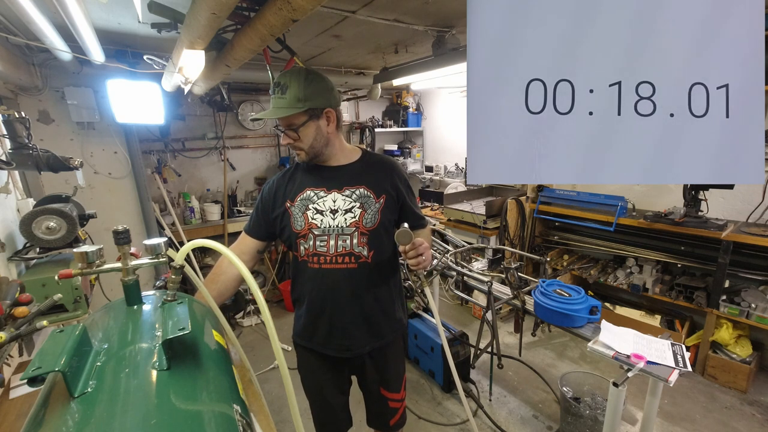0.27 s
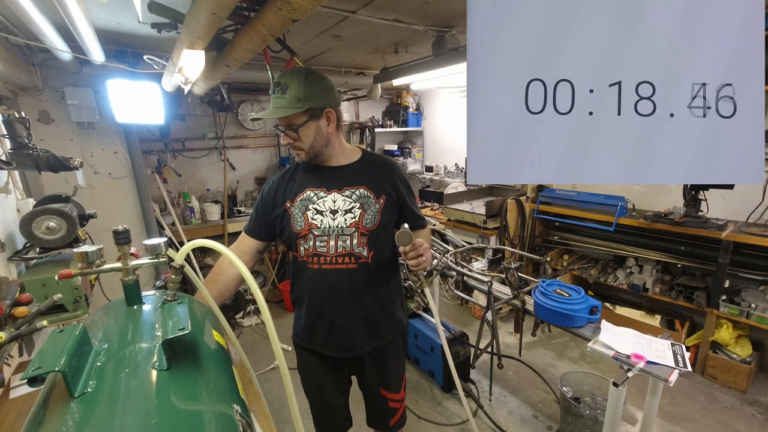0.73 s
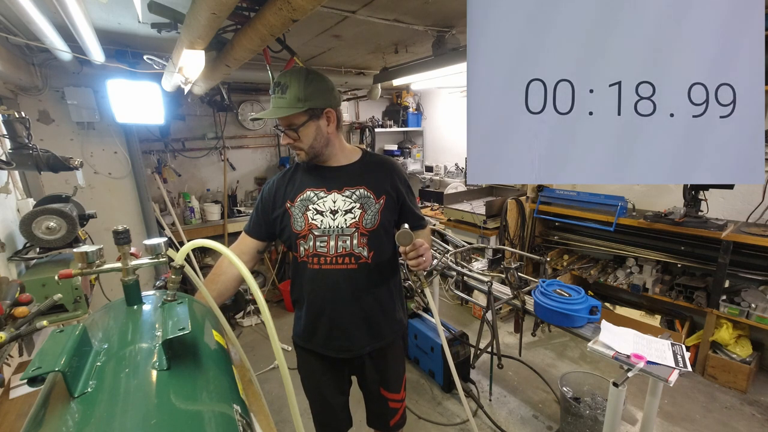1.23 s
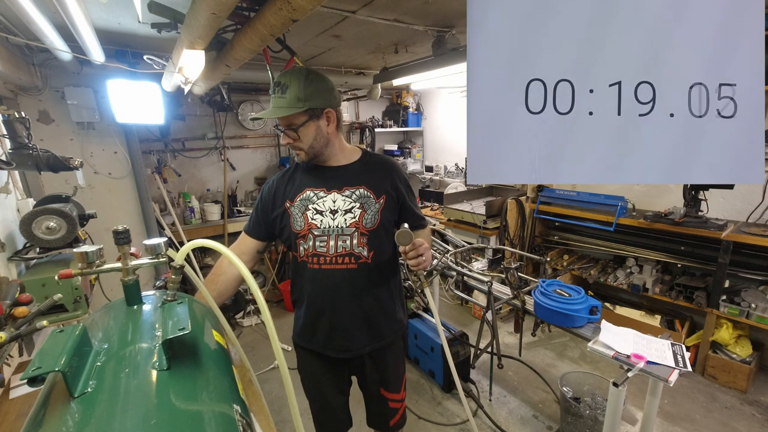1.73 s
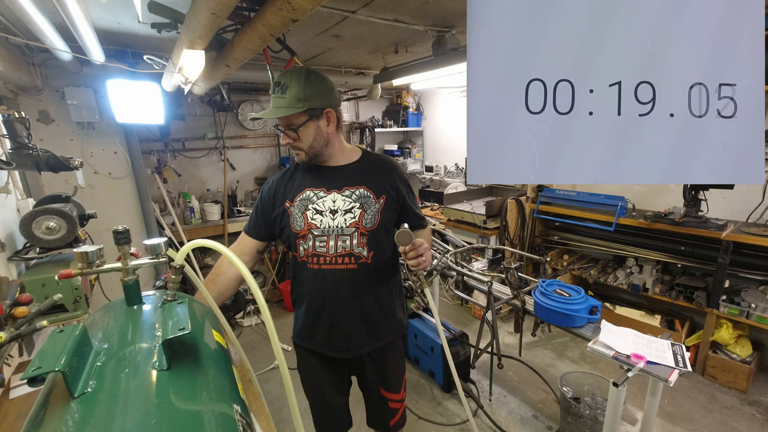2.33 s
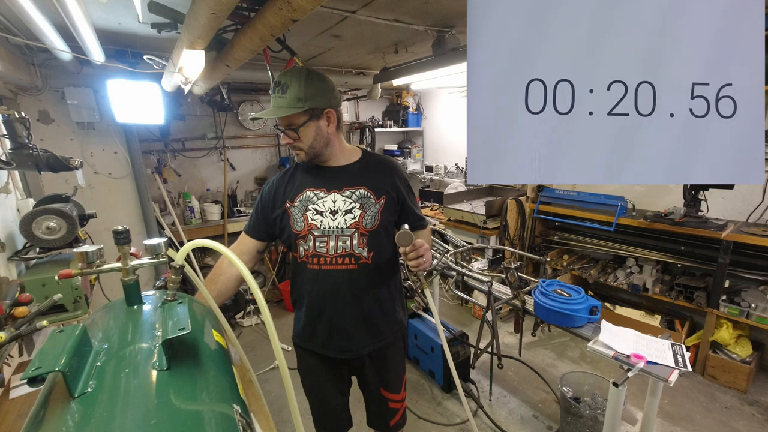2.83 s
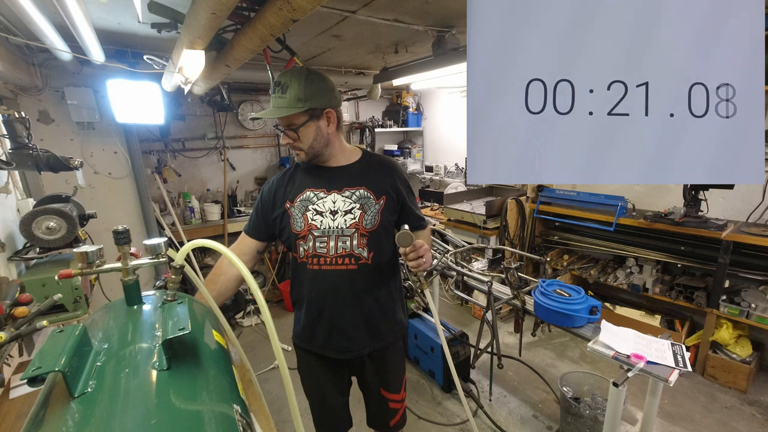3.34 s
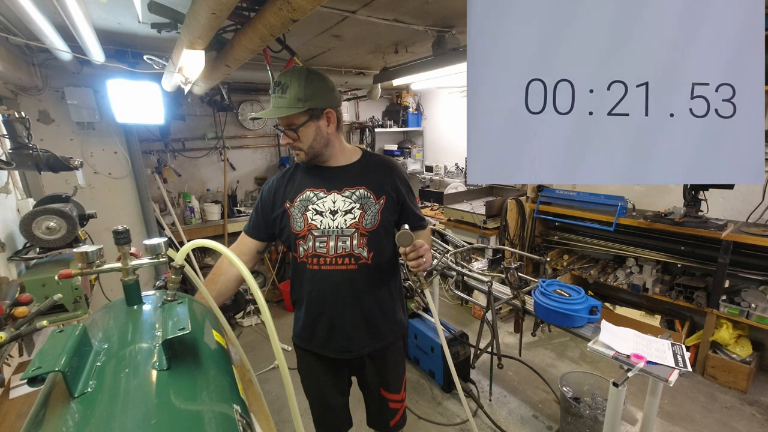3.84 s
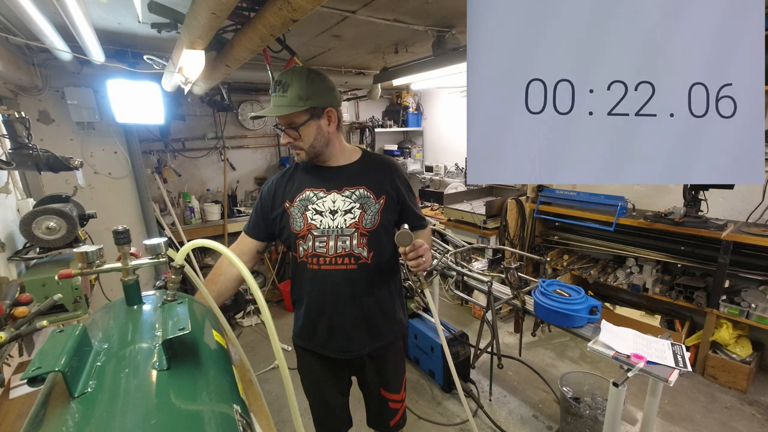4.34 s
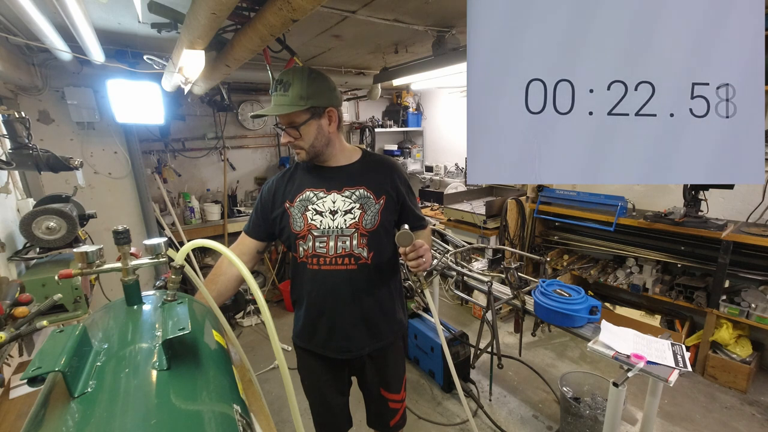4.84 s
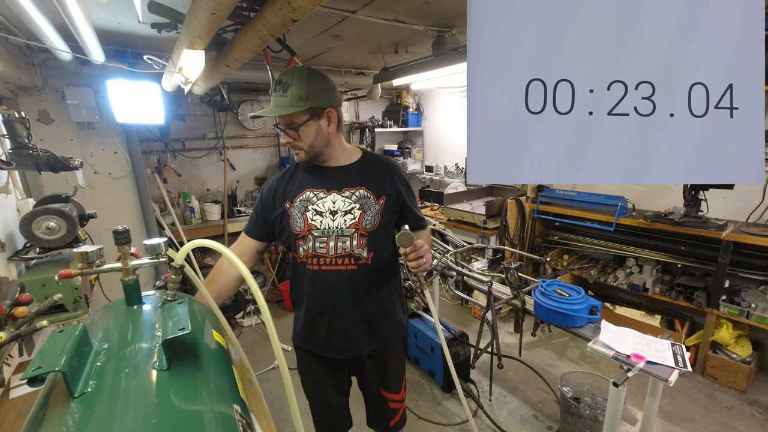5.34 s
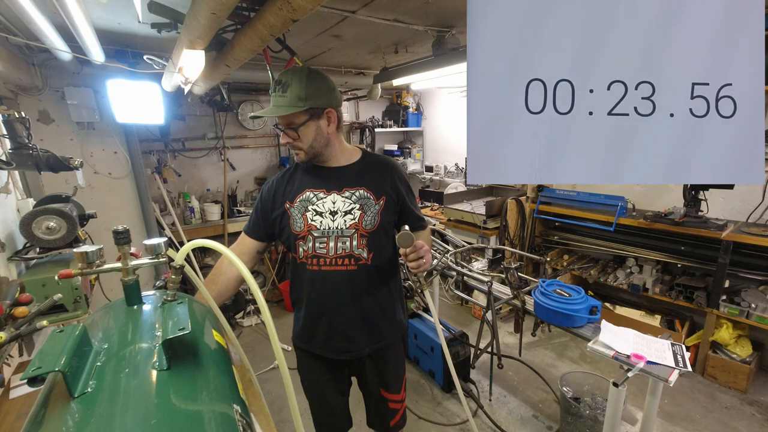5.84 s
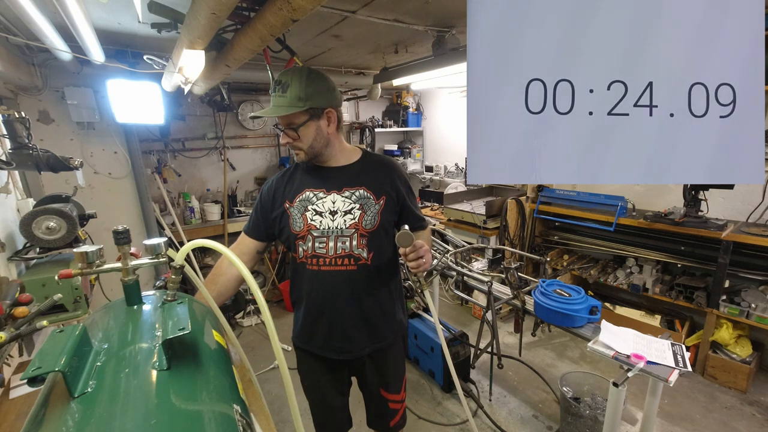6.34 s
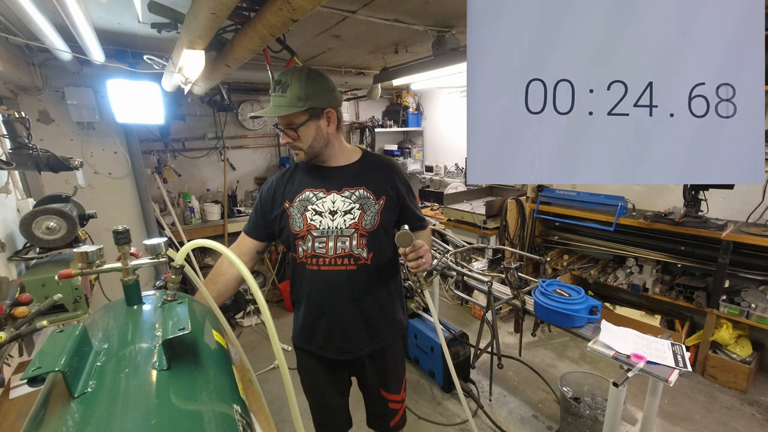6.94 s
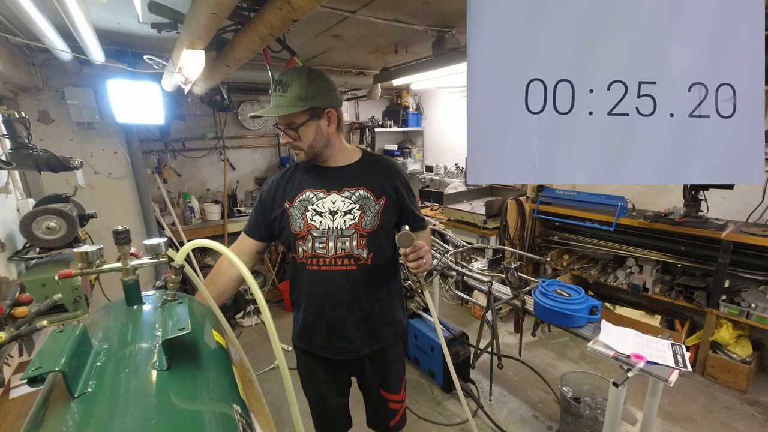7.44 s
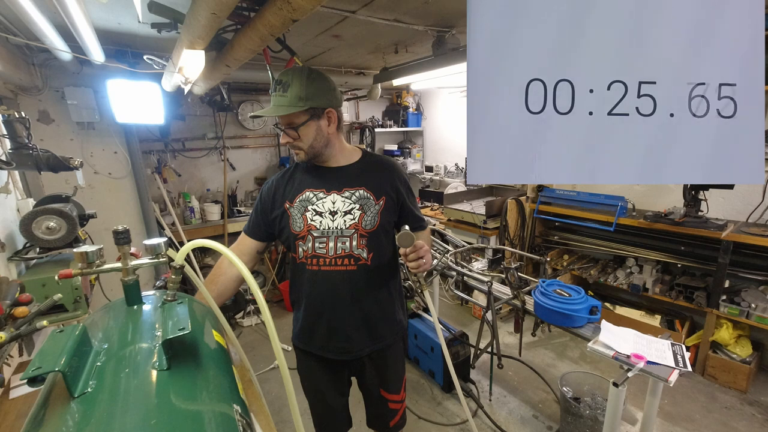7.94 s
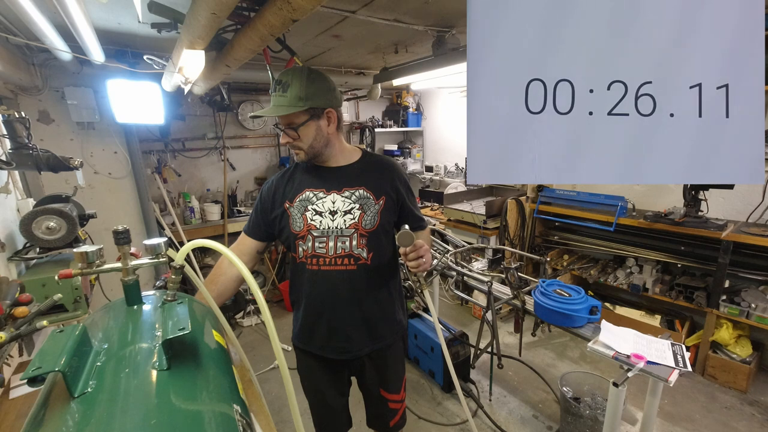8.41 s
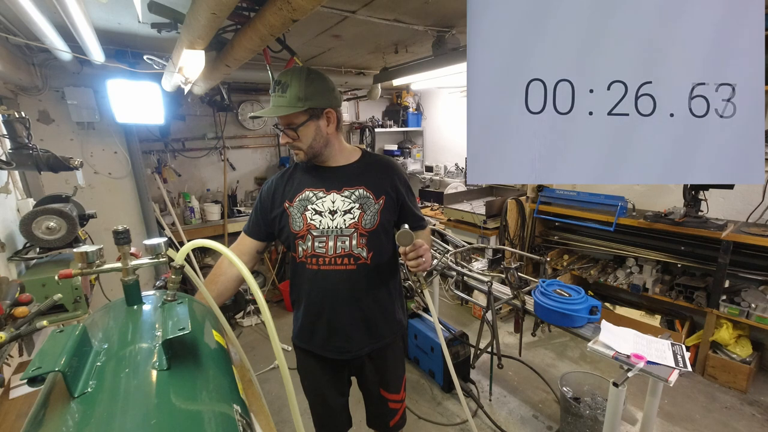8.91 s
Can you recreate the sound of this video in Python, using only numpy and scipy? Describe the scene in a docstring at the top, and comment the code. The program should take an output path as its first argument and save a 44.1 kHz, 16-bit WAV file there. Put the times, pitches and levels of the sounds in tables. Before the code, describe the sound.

An air-powered grinder spins freely in a small workshop, a steady wavering whine around 1.1 kHz wrapped in hissing exhaust air and ticking rattles.

```python
"""A four-vane air grinder spins freely in a small workshop, heard through two microphone ports over rumble and fine hiss.
It starts near 277 turns a second, whining at four times that; noise gated by turn and vane makes the exhaust hiss.
Short rings tick from the first moment; the speed sags unevenly as the hand moves, and the air surges.
From 3.2 s the fifth vane harmonic flares into brief whistles, and a dull knock falls at 5.55 s.
The strongest surge of air swells around 8.6 s."""
import sys
import numpy as np
from scipy import signal
from scipy.fft import rfft, irfft, next_fast_len
from scipy.io import wavfile
from scipy.ndimage import uniform_filter1d, map_coordinates

SR = 44100
rng = np.random.default_rng(int(sys.argv[2]) if len(sys.argv) > 2 else 0)


def dump(signal):
    """Clip the signal to [-1, 1] and save it as 16-bit WAV at the path in sys.argv[1]."""
    limited = np.clip(np.atleast_2d(signal).T, -1, 1)
    pcm = np.round(limited * 32767).astype(np.int16)
    wavfile.write(sys.argv[1], SR, pcm)


def ratio_of_db(decibels):
    """Turn decibels (scalar or array-like) into linear amplitude factors; 0 dB maps to 1."""
    return 10 ** (np.asarray(decibels, float) / 20)


N = 404387


def unit(x):
    """Scale to rms 1."""
    return x / np.sqrt(np.mean(x ** 2) + 1e-20)


def along(points, hz):
    """Read the columns after the frequency of a table, on a log frequency axis."""
    f, *columns = np.transpose(points)
    return np.squeeze([np.interp(np.log(hz + 1), np.log(f + 1), c) for c in columns])


def curves(rows):
    """One value per sample for each column after the time."""
    s, *columns = np.transpose(rows)
    return [np.interp(np.arange(N) / SR, s, c) for c in columns]


def wobble(rate):
    """A smooth random curve, rate knots a second."""
    knots = rng.standard_normal(int(N * rate / SR) + 4)
    return map_coordinates(knots, [np.arange(N) * rate / SR])


def filtered(x, response):
    """Filter x by a response given as a function of frequency."""
    m = next_fast_len(N + 8192)
    return irfft(rfft(x, m) * response(np.fft.rfftfreq(m, 1 / SR)), m)[..., :N]


def resonances(modes, f):
    """Magnitude of a sum in power of resonant peaks; each width is taken 6 dB down."""
    power = sum(ratio_of_db(db) ** 2 / (1 + (2 * (f - c) / w) ** 2) ** 2 for c, w, db in modes)
    return np.sqrt(power)


# how rushing noise differs between the ports: (frequency [Hz], likeness [0..1], lead of the left [rad])
PORT_LIKENESS = [(60, .1, -0.35), (152, 0.07, 0.42), (300, 0.12, -0.45), (1470, 0.39, 0.37),
                 (3300, 0.19, 0.69), (4320, 0.087, -1.64), (7800, 0.79, -0.64)]


def rush(gain, patchy_db, gate=1):
    """Stereo noise of rms 1 with patches of random gain, partly alike at both ports."""
    z = signal.stft(gate * rng.standard_normal((2, N)), nperseg=512)[2]
    field = uniform_filter1d(rng.standard_normal(z.shape[1:]), size=5, axis=0)
    field = uniform_filter1d(field, size=10, axis=1)
    pair = signal.istft(z * ratio_of_db(patchy_db * unit(field)), nperseg=512)[1][:, :N]

    def mix(hz, sign):
        alike, lead = along(PORT_LIKENESS, hz)
        u = np.arccos(np.clip(alike, 0, 1)) / 2
        return gain(hz) * np.exp(.5j * sign * lead) * [np.cos(u), sign * np.sin(u)]

    ports = [filtered(pair, lambda hz: mix(hz, sign)).sum(0) for sign in (1, -1)]
    return unit(np.array(ports))


def bursts(rows, cycles):
    """Short soft-edged rings from (time [s], peak [dB], pitch [Hz]) rows, each a few cycles long."""
    s, db, hz = np.transpose(rows)[:, :, None]
    t = np.arange(-400, 800) / SR
    # the rise is steeper than the decay
    shape = np.exp(-(t * hz / cycles) ** 2 * np.where(t < 0, 1.6, .6))
    ring = ratio_of_db(db) * shape * np.cos(2 * np.pi * hz * t)
    # each ring peaks 2 ms after its listed time
    at = np.clip(np.round((s + 0.002002 + t) * SR).astype(int), 0, N - 1)
    return np.bincount(at.ravel(), ring.ravel(), N)


# colour of the added high hiss: (frequency [Hz], relative level [dB per Hz])
HISS_COLOUR = [(4000, -20), (8000, -2.5), (10000, -4.5), (12500, -2.5), (15500, 0.5)]


def added_hiss():
    """Steady high hiss, unrelated left and right."""
    def colour(f):
        return ratio_of_db(along(HISS_COLOUR, f)) * (f > 3000) * (f < 15720)

    return ratio_of_db(-47.0) * unit(filtered(rng.standard_normal((2, N)), colour))


# colour of the workshop rumble: (frequency [Hz], relative level [dB per Hz])
RUMBLE_COLOUR = [(15, -29), (30, -4.5), (95, 4), (130, -6.5), (250, 6), (600, -2.5), (900, 5)]
# rumble loudness, before a slight wobble: (time [s], level [dB])
RUMBLE_LEVEL = [(0, -58), (2.6, -55.5), (4.5, -59), (6.8, -54.5), (8.2, -62.5), (9.17, -61)]


def workshop_rumble():
    """Low noise below 1 kHz that swells and sinks slowly."""
    rumble = rush(lambda f: ratio_of_db(along(RUMBLE_COLOUR, f)) * (f < 1000), patchy_db=1.2)
    return ratio_of_db(curves(RUMBLE_LEVEL)[0] + 0.31 * wobble(3.9)) * rumble


# a dull knock nearby: (time [s], peak [dB], pitch [Hz])
KNOCK_HIT = [(5.549, -41, 470)]


def knock():
    """One low, quickly damped ring."""
    return bursts(KNOCK_HIT, cycles=2.4)


def workshop(x, wet_db, t60):
    """Close walls and benches answer with a decaying echo and comb the hiss into thin steady strands."""
    t = np.arange(SR // 4) / SR
    echo = rng.standard_normal(len(t)) * ratio_of_db(-60 * t / t60)
    echo = ratio_of_db(wet_db) * echo / np.linalg.norm(echo)
    wet = signal.fftconvolve(x, echo[None], axes=1)[:, :N]
    return (x + wet) / np.hypot(1, ratio_of_db(wet_db))


# loud vane ticks, before the room: (time [s], peak [dB])
LOUD_TICKS = [(0.2311, -23.5), (0.3551, -20), (0.5396, -27), (0.6833, -18.5), (0.733, -18.5), (1.246, -25),
              (1.3504, -15), (1.721, -20), (1.899, -23), (2.287, -24), (2.2994, -19.5), (2.5346, -17),
              (4.6145, -24), (4.9285, -15.5), (5.328, -20.5), (7.193, -21), (7.402, -21), (7.5093, -19),
              (7.5596, -22), (7.592, -19), (7.6765, -17.5), (7.728, -23), (8.3445, -21), (8.461, -22),
              (8.513, -18), (8.5565, -19.5), (8.702, -18), (8.88, -22)]


def ticks(ring_db):
    """Loose vanes slap the housing: the loud slaps, and a dense faint rattle that follows the air flow."""
    draw = rng.random((1600, 3))
    s = draw[:, 0] * N / SR
    level = ring_db[(s * SR).astype(int)] - .6 - 4.7 * np.log(draw[:, 1] + 0.00092)
    hz = np.where(draw[:, 2] < .4, 3050, 3280)
    faint = bursts(np.c_[s, np.minimum(level, -28), hz], cycles=2.5)
    loud = bursts([(s, db, 3260) for s, db in LOUD_TICKS], cycles=3.8)
    # the right port hears them two samples earlier
    return np.array([np.roll(loud + faint, 2), loud + faint])


# air flow between the surges, the base for hiss and ring: (time [s], level [dB])
SLOW_FLOW = [(0, -40.5), (.8, -42), (2.0, -43), (2.6, -42), (3.0, -45), (3.8, -46.5), (4.8, -46.5),
             (5.5, -45.5), (7.0, -45.5), (8.2, -48), (9.17, -47.5)]
# housing ring over the air flow: (time [s], level [dB])
RING_OVER_FLOW = [(0, 10.5), (.3, 7), (1.5, 6.5), (2.9, 6), (4.3, 4), (5.5, 8.5), (6.2, 0), (7.2, 3.5),
                  (7.7, 9), (8.2, 4.5), (9.17, 5.5)]
# surges of air: (time [s], rise [dB], half length [s])
AIR_SURGES = [(.38, 2, 0.1), (0.58, 1.5, 0.074), (0.986, 2.5, 0.048), (1.48, 2, 0.06), (2.122, 3.5, 0.038),
              (2.335, 3.5, 0.058), (2.72, 3, 0.031), (4.538, 3, 0.21), (5.362, 3.5, 0.024),
              (7.42, 3.5, 0.078), (7.616, 4.5, 0.021), (8.58, 7.5, 0.22), (8.888, 3, 0.035),
              (9.17, 3, 0.02)]
RING_GROWS = 1.3  # dB of ring for each dB of surge
RATTLE_DB, RATTLE_S = 24, 0.012  # a loud tick lifts the ring by this plus its own level, fading around it


def air_flow():
    """Base levels in dB of housing ring and jet hiss: slow flow, surges, and the rattle around loud ticks."""
    t = np.arange(N) / SR
    surge_db = sum(db * np.exp(-((t - s) / half) ** 2) for s, db, half in AIR_SURGES)
    lifts = [max(db + RATTLE_DB, 0) * np.exp(-((t - s) / RATTLE_S) ** 2) for s, db in LOUD_TICKS]
    rattle_db = np.max(lifts, axis=0)
    flow_db = curves(SLOW_FLOW)[0]
    ring_db = flow_db + curves(RING_OVER_FLOW)[0] + RING_GROWS * surge_db + rattle_db
    return ring_db, flow_db + surge_db


# narrow noise where the hiss's bandwidth ends: (centre [Hz], width [Hz], relative level [dB])
LOWER_EDGE_BANDS = [(7370, 50, -2), (7470, 50, 0), (7300, 500, -9)]
# the edge reaches higher when the hiss is loud: (centre [Hz], width [Hz], relative level [dB])
UPPER_EDGE_BANDS = [(7900, 50, 0), (8170, 50, 0), (7900, 500, -6)]


def bandwidth_edge(hiss_db):
    """Narrow noise where the hiss's bandwidth ends, growing steeply with hiss level, the upper bands most."""
    over_db = hiss_db + 39.0
    lower = rush(lambda f: resonances(LOWER_EDGE_BANDS, f) * (f < 7550), patchy_db=2.5)
    upper = rush(lambda f: resonances(UPPER_EDGE_BANDS, f) * (f < 8300), patchy_db=5.5)
    return ratio_of_db(-42.0 + 2.7 * over_db) * lower + ratio_of_db(-39.5 + 7.7 * np.minimum(over_db, 1.1)) * upper


# housing resonances: (centre [Hz], width [Hz], relative level [dB])
HOUSING_MODES = [(980, 35, -11), (2850, 110, -5.5), (3030, 70, -1), (3155, 70, -3), (3275, 105, 0),
                 (3385, 60, -6), (3550, 100, -7), (3730, 90, -9), (5430, 40, -9), (5860, 140, -11),
                 (6370, 60, -11)]


def housing_ring(puffs, ring_db):
    """The puffing air excites the resonances of the housing."""
    ring = rush(lambda f: resonances(HOUSING_MODES, f), patchy_db=1.3, gate=puffs)
    return ratio_of_db(ring_db + .1 + .8 * wobble(14)) * ring


# exhaust colour: (frequency [Hz], relative level [dB per Hz])
JET_COLOUR = [(150, -31.5), (420, -22.5), (580, -19), (680, -23.5), (880, -27.5), (1000, -14.5),
              (1500, -13.5), (2400, -12.5), (3200, -13.5), (4500, -12.5), (5500, -12.5), (6600, -15),
              (7100, -24.5), (7600, -63)]
# dark gaps in that colour: (centre [Hz], width [Hz], depth [dB])
JET_GAPS = [(640, 130, 5), (1205, 70, 6), (1570, 120, 7), (1810, 110, 9), (2690, 120, 5), (3660, 70, 3),
            (5620, 150, 3)]


def jet_hiss(puffs, hiss_db):
    """Broad turbulent noise, coloured with dark gaps and gated by the puffs."""
    def colour(f):
        gaps_db = sum(db * np.exp(-(2 * (f - c) / w) ** 2) for c, w, db in JET_GAPS)
        return ratio_of_db(along(JET_COLOUR, f) - gaps_db)

    return ratio_of_db(hiss_db + 7.5 + 0.87 * wobble(9)) * rush(colour, patchy_db=2.0, gate=puffs)


def exhaust(phase, ring_db, hiss_db):
    """Air leaves in puffs, one a turn and one a vane; it hisses and rings the housing."""
    puffs = 1 + 0.13 * np.cos(phase) + 0.29 * np.cos(4 * phase)
    return jet_hiss(puffs, hiss_db) + housing_ring(puffs, ring_db)


# shaft speed, before flutter: (time [s], speed [turns a second])
SHAFT_SPEED = [(.31, 276.7), (.68, 276.4), (.76, 275.0), (.94, 276.4), (1.04, 274.8), (1.17, 275.8),
               (1.24, 274.4), (1.44, 275.7), (1.55, 273.0), (1.62, 273.1), (1.71, 275.3), (1.85, 272.4),
               (2.0, 274.9), (2.07, 272.8), (2.23, 276.1), (2.4, 275.3), (2.46, 274.5), (2.57, 275.5),
               (2.67, 273.6), (2.78, 274.8), (3.06, 269.4), (3.21, 271.9), (3.45, 268.9), (3.54, 270.6),
               (3.64, 269.2), (3.78, 270.6), (3.91, 269.8), (4.28, 274.0), (4.64, 272.4), (4.73, 273.3),
               (4.9, 268.2), (5.03, 271.4), (5.44, 272.3), (5.6, 271.2), (5.7, 271.6), (6.02, 272.4),
               (6.14, 271.7), (6.35, 272.1), (7.11, 271.3), (7.36, 267.8), (7.49, 270.9), (7.55, 268.6),
               (7.68, 268.6), (7.79, 270.8), (8.0, 269.9), (8.12, 268.5), (8.22, 269.2), (8.42, 266.4),
               (8.64, 267.9), (8.71, 267.9), (8.81, 269.7), (8.9, 268.6), (9.0, 270.2), (9.08, 269.4)]


def shaft_speed():
    """Turns a second: an uneven sag with a quick random flutter."""
    return curves(SHAFT_SPEED)[0] + .1 * wobble(12)


# brief drops of a tone, swells where the depth is negative:
# (time [s], shaft order [multiple of speed], depth [dB], half length [s])
TONE_DIPS = [(.79, 4, 6, .055), (1.06, 4, 6, .03), (1.235, 4, 11, .02), (1.54, 4, 6, .045),
             (2.0, 4, 4, .03), (2.47, 4, 5, .03), (2.65, 4, 6, .02), (3.15, 4, 12, .015), (3.2, 4, 5, .025),
             (3.38, 4, -5, .09), (4.09, 4, 5, .05), (4.78, 4, 7, .015), (4.855, 4, -8, .03),
             (5.01, 4, 5, .025), (5.055, 4, -8, .014), (5.09, 4, 6, .012), (5.155, 4, 13, .015),
             (5.22, 4, 4, .03), (5.68, 4, 5, .02), (7.2, 4, -5, .03), (7.26, 4, 8, .025),
             (7.43, 4, -5, .025), (7.5, 4, 7, .035), (8.12, 4, -4, .07), (8.83, 4, 8, .04),
             (9.04, 4, 10, .02), (9.13, 4, 6, .05), (1.2, 8, 10, .02), (2.225, 8, 9, .015),
             (2.92, 8, 10, .025), (3.48, 8, -7, .025), (4.51, 8, -4, .06), (5.07, 8, -6, .02),
             (5.12, 8, 8, .02), (5.42, 8, -3, .12), (1.07, 8, 5, .07), (5.73, 8, 8, .015),
             (6.18, 8, 15, .015), (6.75, 8, 6, .04), (8.35, 8, 7, .03), (8.85, 8, 6, .04),
             (9.12, 8, 7, .06)]
FADE_RATE = 20  # knots a second of the wall echo that beats with each tone


def tone(phase, order, db, lead, waver_db, echo):
    """A sine at a multiple of the shaft speed; the room makes it waver and differ between the ports."""
    t = np.arange(N) / SR
    beat = 1 + echo * (wobble(FADE_RATE) + 1j * wobble(FADE_RATE))
    dips_db = sum(depth * np.exp(-((t - s) / half) ** 2) for s, k, depth, half in TONE_DIPS if k == order)
    db = db + 20 * np.log10(np.abs(beat)) - dips_db
    db = db + waver_db * (wobble(13) + 1.1 * wobble(24))
    angle = order * phase + rng.uniform(0, 2 * np.pi) + .12 * wobble(14) + np.angle(beat)
    # a quadrature part of opposite sign turns the phase between left and right
    across = np.tan(np.clip(lead / 2, -1.25, 1.25)) * np.cos(angle)
    return np.sqrt(2) * ratio_of_db(db) * np.array([np.sin(angle) + across, np.sin(angle) - across])


# vane rates at which the standing-wave levels are listed: (vane rate [Hz])
STANDING_WAVE_HZ = [1066, 1069.2, 1072, 1074.4, 1076.8, 1079.2, 1081.6, 1083.6, 1085.6, 1087.6, 1090,
                    1093.2, 1096.8, 1100, 1103.2, 1107.2]
BUILD_S = 0.038  # the standing waves need this long to follow a change of pitch


def standing_waves(speed, dbs):
    """Level in dB of a tone that the room boosts or cancels as its pitch slides."""
    size = round(BUILD_S * SR)
    gain = ratio_of_db(np.interp(4 * speed, STANDING_WAVE_HZ, dbs))
    # the average looks back in time only
    return 20 * np.log10(uniform_filter1d(gain, size=size, origin=(size - 1) // 2))


# steady shaft orders, bearing-cage tones at 3.28 and 3.62: (multiple of shaft speed, level [dB])
SHAFT_ORDERS = [(1, -56.5), (3.28, -68), (3.62, -61.5), (5, -63), (7, -64), (12, -54)]
# third shaft order at each listed vane rate: (level [dB])
THIRD_ORDER_LEVEL = [-58, -55, -69, -63.5, -70, -63.5, -66, -58.5, -63, -59.5, -59.5, -58, -61.5, -57,
                     -54.5, -55.5]
CAGE_DB, CAGE_DB_PER_HZ = -70.5, 2.5  # lower bearing-cage tone at 272 turns a second, and its growth with speed


def shaft_tones(speed, phase):
    """Faint tones of shaft and bearing cage; the third order rides the standing waves."""
    steady = sum(tone(phase, k, db + .4 * wobble(2.5), .5 * wobble(5) + 0.11, waver_db=.3, echo=.36)
                 for k, db in SHAFT_ORDERS)
    third_db = standing_waves(speed, THIRD_ORDER_LEVEL)
    third = tone(phase, 3, third_db, lead=.5 * wobble(5) + .1, waver_db=1.5, echo=0.25)
    cage_db = CAGE_DB + CAGE_DB_PER_HZ * (speed - 272)
    cage = tone(phase, 1.6, cage_db, lead=.5 * wobble(5) + .1, waver_db=-0.3, echo=0.61)
    return steady + third + cage


# flares of the fifth vane harmonic: (start [s], length [s], level [dB])
WHISTLE_FLARES = [(3.19, .15, -44.5), (4.02, .08, -49), (4.27, .24, -51), (5.05, .12, -46.5),
                  (5.56, .24, -45), (5.84, .09, -46), (6.73, .42, -41), (7.33, .13, -43.5),
                  (7.58, .14, -48), (8.47, .08, -42.5), (8.6, .13, -44), (8.85, .06, -45)]
FIFTH_DB, WHISTLE_EDGE_S = -56, .02  # the fifth vane harmonic at rest, and how fast it flares


def vane_whistle(phase):
    """The fifth vane harmonic flares into a whistle, and the sixth with it, more faintly."""
    t = np.arange(N) / SR
    flare_db = 0
    for s, length, db in WHISTLE_FLARES:
        inside = np.clip(np.minimum(t - s, s + length - t) / WHISTLE_EDGE_S + .5, 0, 1)
        flare_db = flare_db + (db - FIFTH_DB) * inside
    return sum(tone(phase, k, FIFTH_DB + flare_db - under_db, -1.3 + .3 * wobble(4), waver_db=1.4, echo=.26)
               for k, under_db in [(20, 0), (24, 11)])


# standing waves turn the vane tone between the ports: (vane rate [Hz], lead of the left [rad])
VANE_TURN = [(1066, .8), (1072, .95), (1078, 2.1), (1081, 2.2), (1085, .2), (1096, .15), (1103, 0)]
# vane tone at each listed vane rate: (level [dB])
VANE_LEVEL = [-35, -34, -34.5, -43, -43.5, -46.5, -47, -57.5, -37.5, -35.5, -35, -34.5, -36, -34, -31.5,
              -30]
# its second harmonic at each listed vane rate: (level [dB])
SECOND_LEVEL = [-54, -48, -44, -39, -45, -58, -54.5, -46, -53.5, -42.5, -41.5, -33.5, -38, -36.5, -42,
                -37.5]


def vane_whine(speed, phase):
    """Four vanes a turn whine at four times the shaft speed, with a second harmonic."""
    lead = along(VANE_TURN, 4 * speed) + .07 * wobble(6)
    vane = tone(phase, 4, standing_waves(speed, VANE_LEVEL), lead, waver_db=.7, echo=.12)
    second_db = standing_waves(speed, SECOND_LEVEL)
    second = tone(phase, 8, second_db, lead=-.25 + .6 * wobble(4), waver_db=.6, echo=.13)
    return vane + second


def scene():
    """The grinder in the workshop: one shaft phase drives the tones and the puffs of air."""
    background = added_hiss() + workshop_rumble() + knock()
    speed = shaft_speed()
    phase = 2 * np.pi * np.cumsum(speed) / SR
    ring_db, hiss_db = air_flow()
    air = ticks(ring_db) + bandwidth_edge(hiss_db) + exhaust(phase, ring_db, hiss_db)
    whine = shaft_tones(speed, phase) + vane_whistle(phase) + vane_whine(speed, phase)
    return background + workshop(air, wet_db=-11, t60=.15) + whine


def roll_off(x):
    """The treble ends steeply here."""
    return signal.sosfilt(signal.butter(12, 16880, fs=SR, output="sos"), x)


def record(dry):
    """Deliver the finished mix."""
    return roll_off(dry)


dry = scene()
out = record(dry)
dump(out)
```